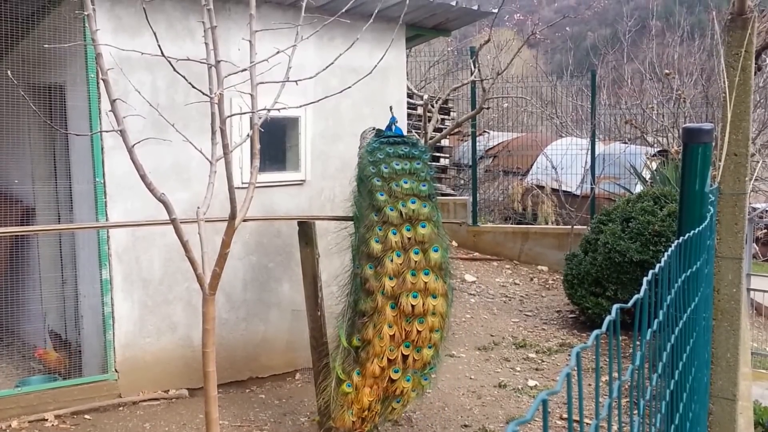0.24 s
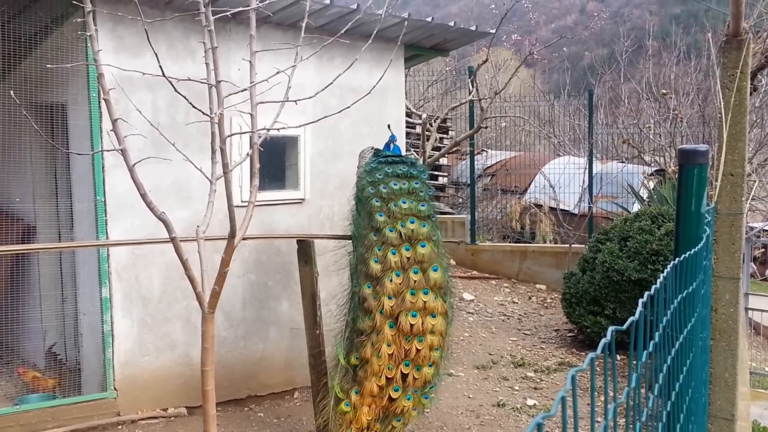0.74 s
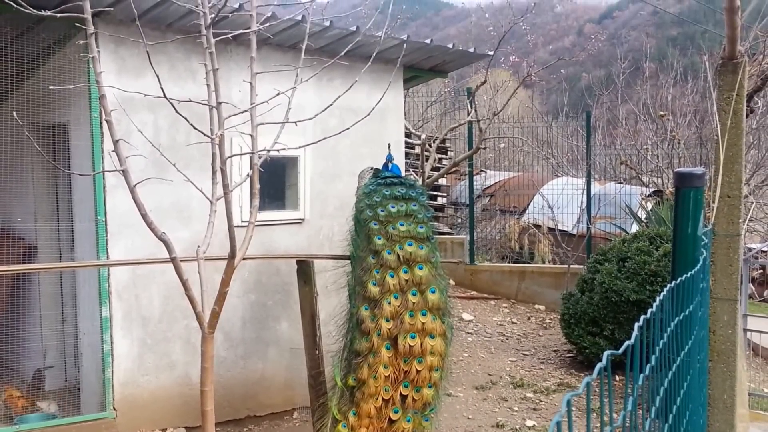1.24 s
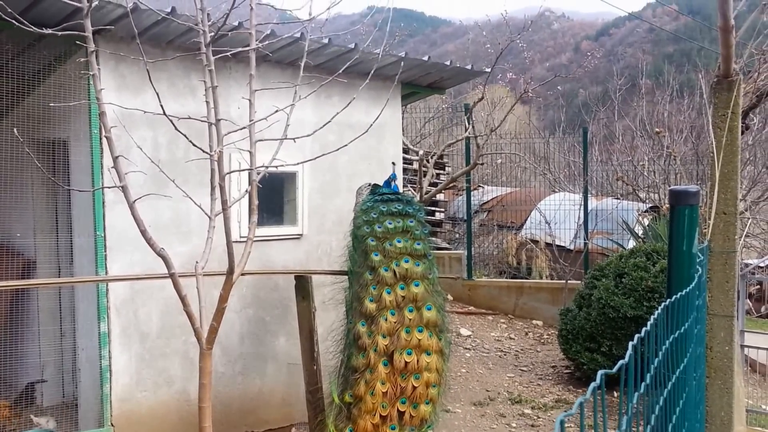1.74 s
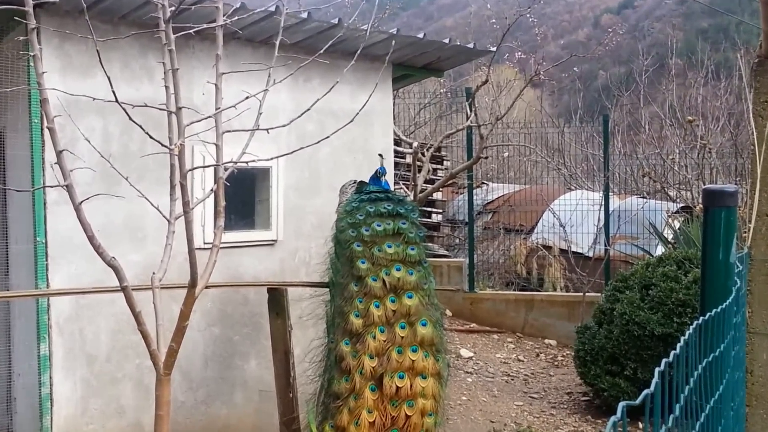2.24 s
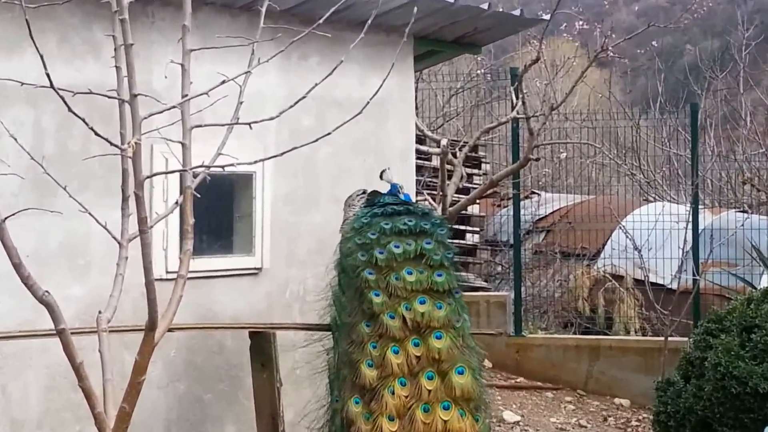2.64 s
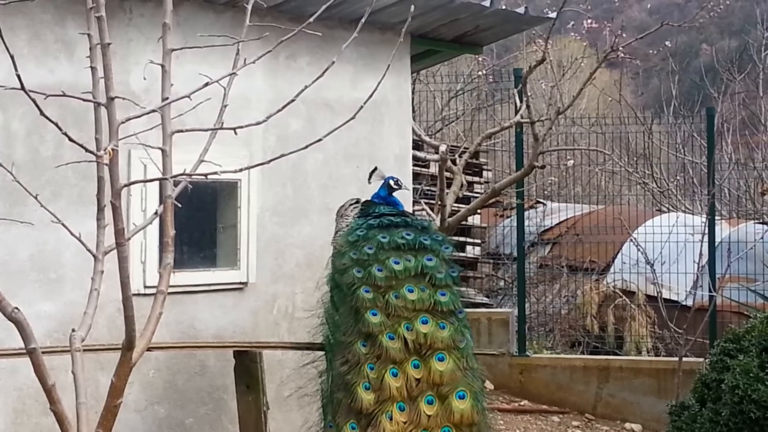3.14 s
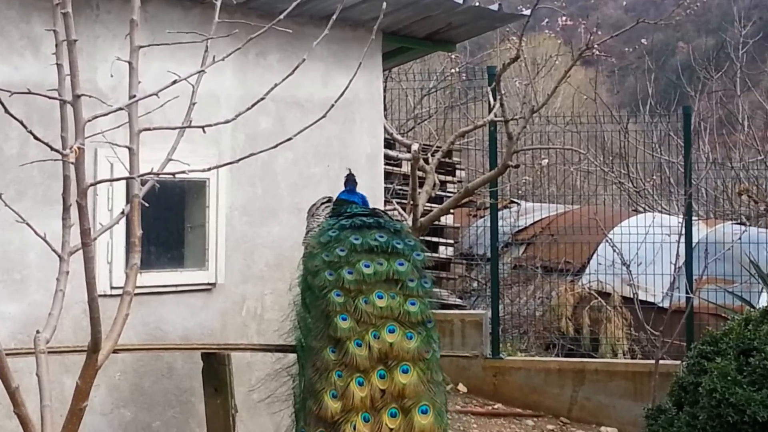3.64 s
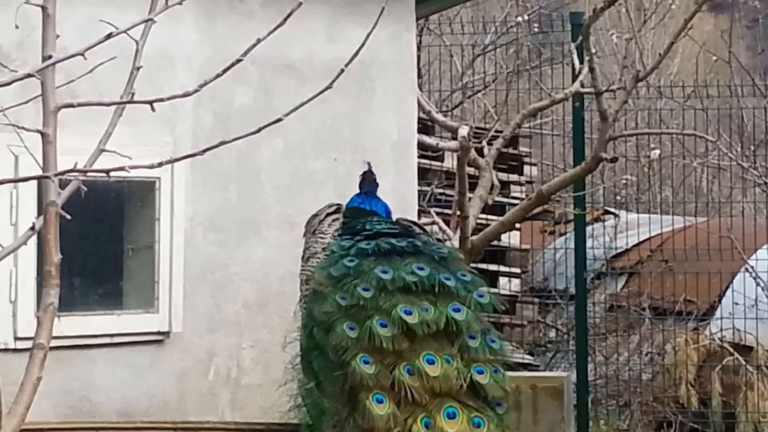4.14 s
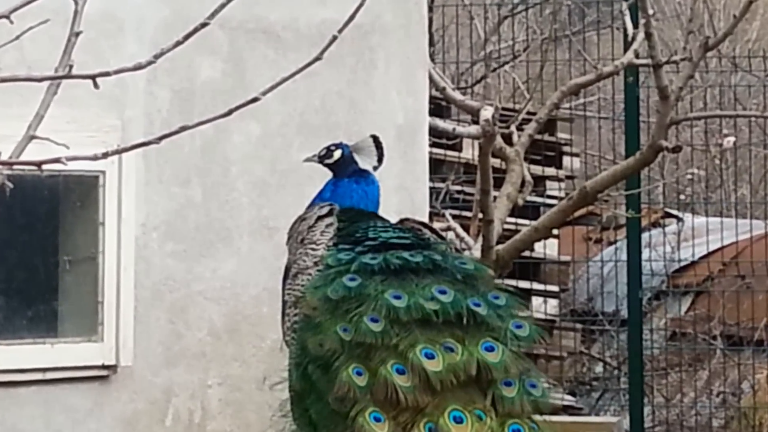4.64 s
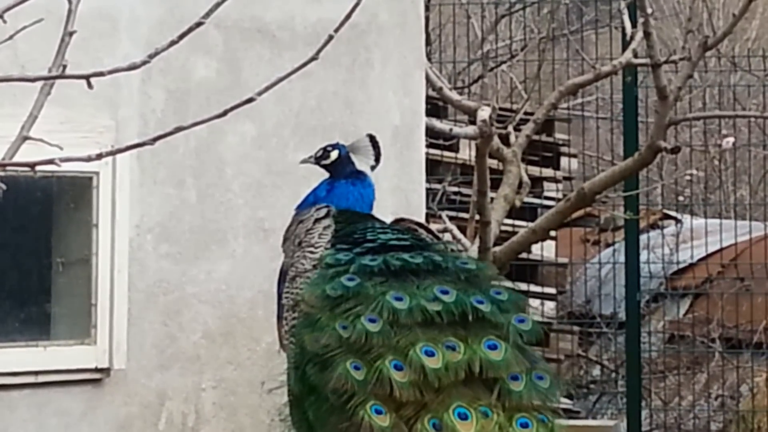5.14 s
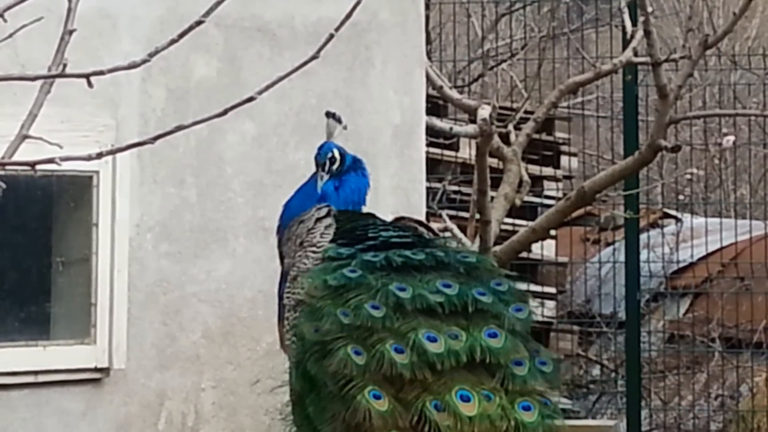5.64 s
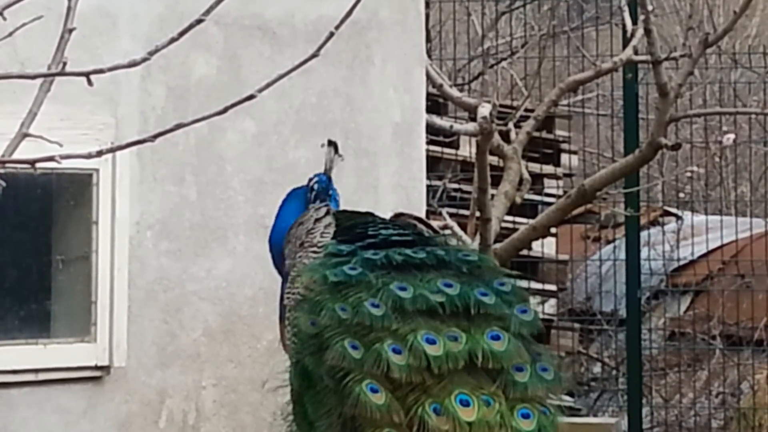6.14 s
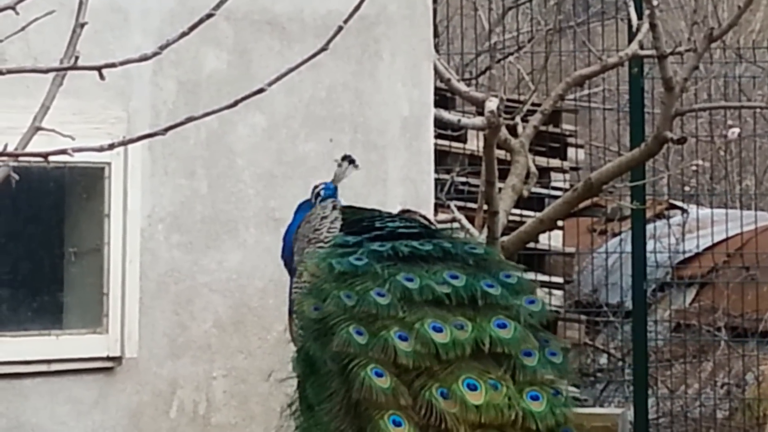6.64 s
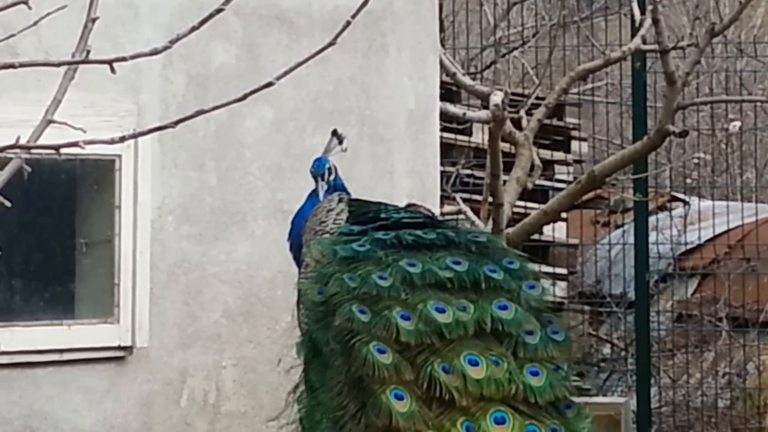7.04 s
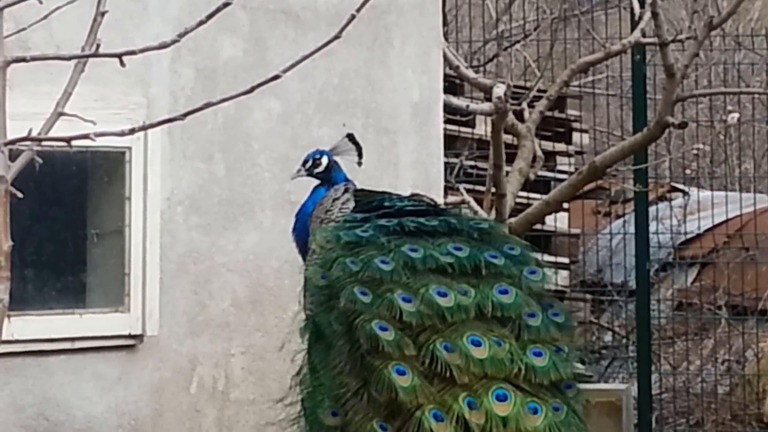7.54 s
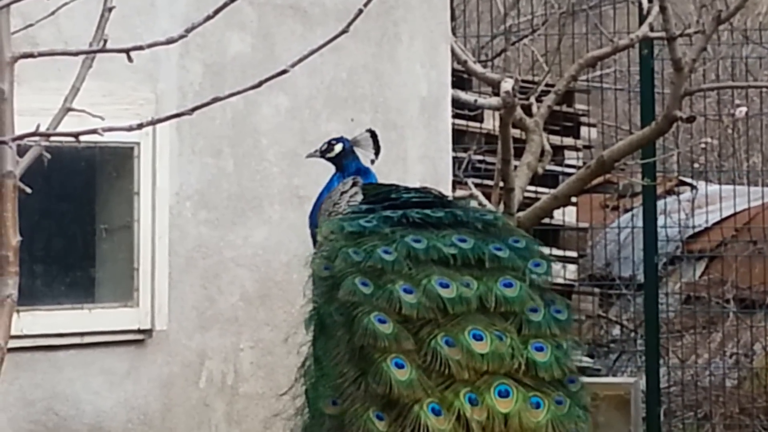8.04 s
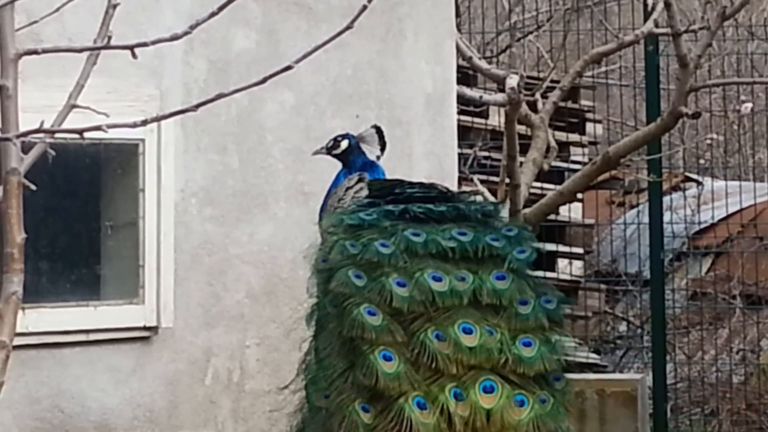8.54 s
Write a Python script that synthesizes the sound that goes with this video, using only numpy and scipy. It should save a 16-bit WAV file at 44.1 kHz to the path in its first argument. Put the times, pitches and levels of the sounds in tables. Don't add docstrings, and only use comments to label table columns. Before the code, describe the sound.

A songbird close on the left sings in a walled yard, its near-pure whistles trailing short echoes. From 0 to 0.5 s come three hooked notes with high dips, then hoarse buzzes near 0.6. A beaded trill runs from 0.8 to 1.6, over faint chick cheeps. Quick upward scoops and climbs fill 1.9 to 3.2, with faint clucks behind. A dry fast rattle at 3.25 leads to five more hooks from 3.6 to 4.4, a buzz around 4.5, four rising notes at 4.9, tiny clicks at 5.3 and dropping notes at 5.75. Thirteen falling slides follow from 6.1 to 7. Soft, spaced pips and distant rasping chatter fill 7 to 8, then a faint held whistle and closing scoops until 8.8. Hiss dips in pauses; wind thumps low, mostly right early on and strongly left near 6.8; dull finger taps mark the first second.

```python
import sys
import numpy as np
from scipy import signal
from scipy.fft import rfft, irfft
from scipy.io import wavfile
from scipy.ndimage import uniform_filter1d

SR = 44100
rng = np.random.default_rng(int(sys.argv[2]) if len(sys.argv) > 2 else 0)


def unload_wav(signal):
    wavfile.write(
        sys.argv[1],
        SR,
        np.round(np.clip(np.atleast_2d(signal).T, -1, 1) * 32767).astype(np.int16),
    )


def convert_level_to_amplitude(level_db):
    exponent = np.asarray(level_db, float) / 20
    return 10 ** exponent


N = 387638

# [t/s, length/s, start f/Hz, end f/Hz, peak level/dB]
SCOOPS = [(1.908, .052, 2640, 4890, -24.5), (1.919, .03, 4400, 5520, -24.6),
          (2.104, .043, 2930, 3750, -26.7), (2.183, .024, 2390, 3000, -35.3),
          (2.2, .049, 4640, 4960, -21.4), (2.386, .034, 2210, 3260, -26.8), (2.482, .03, 2700, 4200, -22.6),
          (2.725, .033, 2520, 3400, -28.1), (2.79, .05, 3700, 4450, -29.2),
          (5.547, .025, 6300, 5250, -14.2), (5.686, .034, 4860, 5740, -20), (6.58, .04, 4000, 4450, -41),
          (6.82, .04, 4050, 4400, -41), (8.488, .041, 2520, 3160, -29.2), (8.602, .041, 2980, 4240, -24.6),
          (8.753, .013, 4800, 7100, -33)]
# [t/s, length/s, start f/Hz, end f/Hz, peak level/dB]
RAMPS = [(.154, .033, 5530, 4940, -40.5), (.409, .019, 5350, 4990, -37.9), (1.806, .014, 3300, 5800, -41.6),
         (2.79, .05, 4950, 6000, -25.7), (3.028, .046, 3190, 3790, -27), (3.147, .036, 4350, 5900, -25),
         (3.174, .016, 5700, 7100, -36), (3.7, .018, 5100, 6000, -43), (7.175, .042, 5250, 3900, -29),
         (5.566, .011, 5300, 3000, -29), (8.385, .03, 2800, 4400, -26), (8.764, .032, 7000, 5100, -28)]
# [t/s, length/s, start f/Hz, end f/Hz, peak level/dB]
SAGS = [
    (1.587, .102, 2560, 1850, -30.1),
    (4.465, .054, 4730, 5350, -33.5),
    (6.062, .036, 3650, 2200, -21.8),
]
# [t/s, length/s, start f/Hz, end f/Hz, peak level/dB]
CLIMBS = [
    (2.278, .056, 2550, 4150, -19),
    (2.6, .065, 2600, 4300, -20),
    (4.818, .012, 2800, 5400, -16),
    (2.71, .085, 4500, 5300, -36),
    (2.77, .14, 4300, 5500, -39),
]
# [t/s, length/s, f/Hz, peak level/dB]
HOLDS = [(1.812, .05, 5810, -26.6), (2.006, .05, 2840, -43), (2.157, .032, 4250, -30.5),
         (4.544, .019, 2660, -38.1), (4.511, .04, 3950, -28), (2.075, .03, 3550, -40),
         (6.35, .05, 1280, -50), (6.61, .065, 4500, -39), (6.845, .11, 4430, -39), (6.54, .04, 1400, -49),
         (7.33, .045, 800, -49), (8.15, .25, 3740, -35), (8.726, .054, 7600, -38.7)]
# [t/s, lowest f/Hz, peak level/dB]
DIPS = [(.126, 6390, -30.9), (.298, 6040, -33.9), (2.009, 6330, -21.7), (2.526, 5700, -22),
        (2.912, 5800, -25.2), (3.715, 5870, -26), (3.893, 5870, -24.4), (4.078, 6130, -32.1),
        (4.256, 6130, -29.8), (8.408, 6080, -37.6)]
# [t/s, peak level/dB]
CHIRPS = [(.091, -37.6), (.256, -38.7), (3.68, -39.9), (3.855, -37), (4.044, -41.1), (4.219, -39),
          (8.275, -38.7)]
# [t/s, peak level/dB]
PIPS = [(7.075, -43), (7.12, -42), (7.18, -41), (7.23, -39), (7.285, -38), (7.352, -33.1), (7.392, -39),
        (7.472, -35), (7.589, -35.4), (7.699, -36), (7.813, -33.2), (7.927, -36.3), (8.038, -32.4)]
# [t/s, length/s, start f/Hz, end f/Hz, peak level/dB]
BUZZES = [(.04, .05, 5500, 5600, -40.9), (.44, .07, 2150, 2300, -40.9), (.562, .03, 7000, 6100, -37.1),
          (.575, .045, 5400, 4000, -30), (.635, .12, 2300, 2350, -38.1), (4.397, .075, 1980, 2710, -38.6),
          (4.535, .025, 7000, 5500, -32), (4.557, .028, 5000, 4100, -22), (4.597, .028, 4260, 4500, -29),
          (4.605, .12, 2450, 2370, -37.4), (5.636, .038, 2340, 3030, -36.9), (7.13, .03, 3450, 3050, -40),
          (7.19, .05, 5300, 4300, -33), (7.235, .039, 2150, 1870, -41), (7.29, .035, 3400, 2950, -41),
          (7.4, .035, 3450, 2950, -41), (7.47, .03, 6350, 6150, -47), (7.477, .029, 1750, 2080, -40.1),
          (7.62, .048, 1750, 1350, -36.8), (8.41, .04, 4800, 5300, -38.7)]
# [t/s after start, f/Hz, level/dB]
HOOK = [(0, 3600, -40), (.009, 4500, -9), (.021, 4450, 0), (.027, 4250, -10), (.032, 3950, -3),
        (.037, 2800, -32)]
RISE = [(0, 2500, -22), (.008, 3200, -9), (.017, 3750, -2), (.031, 3900, 0), (.034, 3900, -20)]
SLIDE = [(0, 4000, -20), (.009, 3850, -1), (.017, 3450, -11), (.024, 3000, 0), (.035, 2150, -23)]
DROP = [(0, 6300, -12), (.003, 5000, 0), (.006, 3600, -7), (.009, 2900, -18)]
BEAD = [(0, 2450, -20), (.005, 2600, -8), (.012, 2780, 0), (.02, 2750, -20)]
CLICK = [(0, 2600, -16), (.002, 4600, 0), (.005, 6600, -14)]
ZIG = [(0, 6900, -9), (.0025, 5600, 0), (.005, 4500, -3), (.008, 5400, -3), (.0135, 7200, -11)]
# [shape, repeats,
# (t/s, first gap/s, last gap/s, first level/dB, last level/dB, drift of f/Hz)]
PHRASES = [
    (HOOK, dict(count=3), (.013, .169, .179, -14, -16, -40)),
    (BEAD, dict(count=19), (.805, .039, .0428, -19.5, -26, -30)),
    (ZIG, dict(count=22), (3.243, .0148, .0128, -16.5, -25, -2000)),
    (HOOK, dict(count=5), (3.597, .18, .181, -17.5, -16.5, 0)),
    (RISE, dict(count=4), (4.905, .096, .112, -20, -19.5, 30)),
    (CLICK, dict(count=10), (5.323, .012, .023, -32, -29, 300)),
    (DROP, dict(count=6), (5.756, .0505, .0505, -21, -25, -250)),
    (SLIDE, dict(count=13), (6.128, .068, .074, -19, -20, 30)),
]
# [t/s, length/s, start f/Hz, end f/Hz, peak level/dB]
FAR_CALLS = [(.51, .06, 2600, 3600, -42.8), (2.05, .05, 4400, 4750, -40), (2.9, .12, 2750, 3150, -45),
             (3.7, .06, 2800, 3150, -45.4), (3.74, .18, 600, 750, -46.8), (4.44, .07, 2750, 3350, -44),
             (3.95, .07, 5100, 5300, -45), (4.44, .07, 4150, 4800, -40), (5.04, .125, 1700, 2450, -44),
             (5.045, .12, 2200, 2900, -46), (5.37, .25, 1750, 2500, -48), (3.44, .18, 930, 1150, -54),
             (3.38, .08, 500, 560, -52), (2.79, .06, 2400, 2500, -49), (8.575, .05, 4350, 4700, -43),
             (8.708, .03, 2400, 3700, -43)]
# [t/s, peak level/dB, centre f/Hz]
RASPS = [(.575, -36, 3500), (2.225, -42, 6500), (2.34, -43, 6700), (2.76, -42, 6500), (2.89, -42, 6700),
         (3.04, -45, 7000), (4.33, -43, 1100), (4.4, -41, 900), (4.42, -41, 1700), (4.62, -42, 1800),
         (4.68, -43, 1700), (4.548, -33, 4500), (6.53, -44, 1700), (6.64, -44, 2000), (6.84, -40, 5600),
         (6.98, -40, 5800), (6.98, -42, 2000), (7.075, -43, 4900), (7.07, -40, 2900), (7.19, -36, 5000),
         (7.3, -43, 4900), (7.3, -43, 2300), (7.41, -43, 2700), (7.1, -43, 6200), (7.118, -41, 1600),
         (7.14, -43, 4900), (7.2, -41, 3100), (7.235, -42, 6200), (7.26, -41, 4800), (7.355, -43, 6200),
         (7.355, -43, 1900), (7.39, -43, 4700), (7.475, -43, 4600), (7.475, -42, 3000), (7.5, -44, 5800),
         (7.612, -41, 5900), (7.62, -43, 4600), (7.63, -43, 2900), (7.69, -45, 4500)]
# [t/s, f/Hz, peak level/dB]
CHEEPS = [
    (.795, 1075, -36),
    (1.005, 1065, -41),
    (1.25, 1070, -47),
    (1.415, 1070, -44),
    (7.872, 1020, -46),
    (8.26, 940, -49),
]
# [t/s, f/Hz, peak level/dB]
CLUCKS = [
    (2.222, 640, -42),
    (2.475, 640, -43),
    (3.565, 550, -48),
    (4.225, 600, -48),
]
# [delay t/s, level/dB]
BOUNCES = [(.0065, -15), (.011, -14), (.017, -15), (.028, -16)]
# [t/s, left level/dB, right level/dB]
WIND = [(0, -61, -62), (.8, -61, -53), (1.6, -59, -37), (2.3, -56, -57), (2.7, -58, -55), (2.87, -59, -46),
        (3.1, -59, -50), (4.1, -51, -54), (4.79, -61, -55), (4.84, -60, -44), (4.93, -60, -54),
        (5.15, -60, -51), (5.45, -60, -57), (6.59, -47, -53), (6.8, -32, -53), (7.1, -56, -53),
        (7.58, -52, -39), (7.98, -56, -55), (8.18, -44, -49), (8.78, -49, -55)]
# [t/s, peak level/dB]
LEFT_PUFFS = [(5.9, -26), (6.12, -30), (6.777, -18.5), (6.803, -21.1), (6.845, -17.2), (7.31, -28),
              (7.44, -29), (7.52, -29), (8.16, -26), (8.44, -29), (8.55, -29)]
# [t/s, peak level/dB]
RIGHT_PUFFS = [(.596, -21.6), (.672, -14.2), (.884, -33), (1.002, -14.6), (1.175, -11.7), (1.335, -17.7),
               (1.448, -14), (1.592, -14.3), (1.623, -9.4), (1.668, -10.5), (1.755, -12.9), (1.964, -31),
               (2.385, -24), (2.784, -30), (2.85, -33), (2.915, -21), (3.251, -20.8), (3.299, -9),
               (4.25, -27), (4.43, -29), (4.821, -13), (4.86, -25), (5.082, -32), (5.13, -31), (5.25, -33),
               (7.43, -26), (7.571, -14.6), (7.727, -20.5), (7.85, -35), (7.9, -32), (8.08, -35),
               (8.148, -17), (8.18, -25), (8.44, -28)]
# [t/s, peak level/dB, ring f/Hz]
TICKS = [
    (.288, -29, 480),
    (.344, -28, 520),
    (.441, -28, 480),
    (.467, -33, 480),
    (.63, -32, 520),
    (1.739, -40, 2500),
    (5.248, -28, 2500),
]
# [f/Hz, left level/dB per Hz, right level/dB per Hz]
AIR = [(200, -91, -91), (700, -88.5, -89), (1500, -89.5, -99), (2200, -93, -102), (4000, -94, -103),
       (7500, -101.5, -103.5), (14000, -102, -104.5)]
# [deepest t/s, depth level/dB, sinking time/s]
DUCKS = [(.539, -6, .09), (.773, -5.5, .19), (1.711, -6.5, .06), (1.791, -10, .05), (2.454, -5, .055),
         (4.689, -4, 1.2), (4.804, -14, .115), (5.53, -7, .05), (7.343, -6.5, .24), (7.563, -7.5, .055),
         (7.792, -12.5, .065), (8.012, -14, .07), (8.132, -9, .085), (8.366, -6.5, .15)]


def scene():
    song = yard(birds())
    song_db = 10 * np.log10(uniform_filter1d(song[0] ** 2, size=900).clip(1e-9))
    opening_db = np.clip(.15 * (song_db + 50), -1.5, 2.5)
    left, right = song + air() * convert_level_to_amplitude(np.array([opening_db, .25 * opening_db]))
    return np.array([thin(left), right]) + wind() + ticks()


def birds():
    track = np.zeros(N)
    for s, note in whistles() + far_voices():
        add(track, s, note)
    buzzes(track)
    phrases(track)
    return track


def whistles():
    kinds = (SCOOPS, .8), (RAMPS, .46), (SAGS, .17), (FAR_CALLS, .7)
    notes = [(s, glide(*note, bend)) for rows, bend in kinds for s, *note in rows]
    notes += [(s, glide(*note, .42, late=4.5)) for s, *note in CLIMBS]
    notes += [(s, arc(length, hz, hz, hz, db, rough_hz=28)) for s, length, hz, db in HOLDS]
    notes += [(s, glide(.033, 1970, 2330, db, .88)) for s, db in CHIRPS]
    pip_hz, pip_ends = 3690, 1.017
    for s, db in PIPS:
        notes.append((s, arc(.03, pip_ends * pip_hz, pip_hz, pip_ends * pip_hz, db, rough_hz=28)))
    dip_s = .035
    for s, hz, db in DIPS:
        notes.append((s, arc(dip_s, 1.045 * hz, hz, 1.025 * hz, db)))
        notes.append((s + dip_s - .006, glide(.022, hz, 1.11 * hz, db - 16, .5)))
    return notes


def glide(length, start_hz, end_hz, db, bend, **rough):
    mid_hz = start_hz + bend * (end_hz - start_hz)
    return arc(length, start_hz, mid_hz, end_hz, db, **rough)


def arc(length, start_hz, mid_hz, end_hz, db, rough_hz=60, late=1.1):
    u = np.linspace(0, 1, num=17)
    hz = start_hz * (1 - u) * (1 - 2 * u)
    hz += 4 * mid_hz * u * (1 - u)
    hz += end_hz * u * (2 * u - 1)
    swell_db = db - 22.5 * np.abs(2 * u ** late - 1) ** 3.5
    return sing(int(length * SR), u * length, hz, swell_db, rough_hz)


def sing(out_len, s, hz, db, rough_hz=35):
    t = np.arange(out_len) / SR
    trembling_hz = np.interp(t, s, hz) + rough_hz * shiver(out_len, size=49)
    phase = 2 * np.pi * (np.cumsum(trembling_hz) / SR + rng.random())
    top_hz = np.max(hz)
    octave_db = -31 - 11 * (3000 < top_hz < 5400 or np.ptp(hz) > 1800)
    third_db = -50 + 17 * (3950 < top_hz < 5400)
    tone = np.sin(phase) + convert_level_to_amplitude(octave_db) * np.sin(2 * phase) + convert_level_to_amplitude(third_db) * np.sin(3 * phase)
    edge = np.clip(np.minimum(t, t[::-1]) / .001, 0, 1)
    return tone * convert_level_to_amplitude(np.interp(t, s, db)) * edge


def buzzes(track):
    for s, length, *note in BUZZES:
        tone = glide(1.2 * length, *note, .55, rough_hz=.034 * np.mean(note[:2]))
        flutter_hz = 230 * (1 + .2 * shiver(len(tone), size=150))
        flutter = .5 + .5 * np.sin(2 * np.pi * np.cumsum(flutter_hz) / SR)
        add(track, s, 2.2 * tone * flutter ** 1.8)


def phrases(track):
    for shape, repeats, (s, gap, last_gap, db, last_db, drift_hz) in PHRASES:
        at, hz, rel_db = np.transpose(shape)
        count, rattle = repeats["count"], shape == ZIG
        drift_share = np.interp(hz, [min(hz), max(hz)], [1, .4]) if rattle else 1
        for k, (detune, uneven) in enumerate(rng.standard_normal((count, 2))):
            u = k / (count - 1)
            pitch_hz = (hz + u ** .7 * drift_hz * drift_share) * (1 + .006 * detune)
            now_db = rel_db + db + u * (last_db - db) + .8 * uneven
            if rattle:
                now_db = now_db - 3.0 * ((pitch_hz - 5050) / 1100) ** 2
                now_db = now_db - 9 * .45 ** k
            add(track, s, sing(int(at[-1] * SR), at, pitch_hz, now_db, 110 if rattle else 35))
            s += gap + (last_gap - gap) * k / (count - 2)


def far_voices():
    notes = [(s, rasp(*call)) for s, *call in RASPS]
    notes += [(s, stack(*call, throat_hz=4900, width_hz=1050)) for s, *call in CHEEPS]
    return notes + [(s, stack(*call, throat_hz=1250, width_hz=750)) for s, *call in CLUCKS]


def rasp(db, hz):
    length, rate_hz, span = .05, 110, 1.17
    u = np.linspace(0, 1, int(length * SR))
    chop = np.sin(np.pi * rate_hz * length * u) ** 2 * np.sin(np.pi * u ** .5)
    breath = chop * rng.standard_normal(len(u))
    return convert_level_to_amplitude(db + 5) * band(breath, hz / span, hz * span, order=3)


def stack(hz, db, throat_hz, width_hz):
    length = .04
    t = np.arange(int(length * SR)) / SR
    wobble = .03 * shiver(len(t), size=100)
    phase = 2 * np.pi * np.cumsum(hz * (1 - .08 * np.exp(-t / .008) + wobble)) / SR
    k = np.arange(1, 8)[:, None]
    resonance = np.exp(-((k * hz - throat_hz) / width_hz) ** 2)
    tone = np.sum(resonance * np.sin(k * phase + k * k), axis=0)
    return convert_level_to_amplitude(db) * tone * np.sin(np.pi * (t / length) ** .7)


def shiver(length, size):
    smooth = uniform_filter1d(rng.standard_normal(length + size), size=size)
    return smooth[:length] * np.sqrt(size)


def add(track, s, x):
    i = max(int(s * SR), 0)
    track[i:i + len(x)] += x[:len(track) - i]


def band(x, low_hz, high_hz, order=2):
    edges_hz = [low_hz, min(high_hz, .45 * SR)]
    return signal.sosfilt(signal.butter(order, edges_hz, "band", fs=SR, output="sos"), x)


def walk(rate, channels=1):
    k = int(SR / rate)
    levels = rng.standard_normal((channels, N // k + 1))
    return uniform_filter1d(levels[:, np.arange(N) // k], k)


def yard(x):
    t = np.arange(int(.6 * SR)) / SR
    walls = convert_level_to_amplitude(-38.3 - 60 * t / .26) * np.clip(t / .004, 0, 1) / (1 + np.exp((t - .05) / .006))
    tail = convert_level_to_amplitude(-46 - 60 * t / .45) * np.clip(t / .01, 0, 1)
    grain = rng.standard_normal((3, len(t))) * convert_level_to_amplitude(4.0 * rng.standard_normal((3, len(t))))
    turn = 1.5 * walk(6)[0]
    aims = np.cos(turn), np.sin(turn), 1
    one, other, aside = (signal.fftconvolve(x * aim, (walls + tail) * g)[:N] for aim, g in zip(aims, grain))
    near = x.copy()
    for (s, db), sway in zip(BOUNCES, walk(9, channels=4)):
        near += convert_level_to_amplitude(db + 2.2 * sway) * np.roll(x, int(s * SR))
    left = near + one + other
    right = near + .7 * (one + other) + .7 * aside
    shaded = convert_level_to_amplitude(-28) * right + convert_level_to_amplitude(-19) * band(right, 300, 2350)
    return np.array([np.roll(left, shift=18), shaded])


def wind():
    s, *db = np.transpose(WIND)
    eddies = rng.standard_normal((2, N)) * convert_level_to_amplitude(7.0 * rng.standard_normal((2, N)))
    rumble = band(eddies, 42, 175) * convert_level_to_amplitude(3.5 * walk(25, channels=2))
    gust_db = np.array([np.interp(np.arange(N) / SR, s, d) for d in db])
    rumble *= convert_level_to_amplitude(gust_db + 1.5) / rumble.std()
    t = np.arange(-600, 1800) / SR
    puffs = [(0, *row) for row in LEFT_PUFFS] + [(1, *row) for row in RIGHT_PUFFS]
    for (port, s, db), turn in zip(puffs, rng.random(len(puffs))):
        cycles = t * (205 + 3.2 * db)
        swell = np.where(t < 0, np.exp(-(cycles / .3) ** 2), np.exp(-cycles / .6))
        slowing = 1.5 * np.sign(cycles) * np.log1p(.7 * np.abs(cycles))
        add(rumble[port], s + t[0], convert_level_to_amplitude(db + 2.5) * swell * np.cos(2 * np.pi * (turn + slowing)))
    return band(rumble, 35, 600, order=1)


def ticks():
    out, t = np.zeros(N), np.arange(400) / SR
    for s, db, hz in TICKS:
        burst = rng.standard_normal(len(t)) * np.exp(-t / .0015)
        add(out, s, convert_level_to_amplitude(db + 4) * band(burst, .5 * hz, 2.5 * hz, order=1))
    return out * convert_level_to_amplitude(np.array([[-7], [0]]))


def air():
    hz, *db = np.transpose(AIR)
    f = np.arange(N // 2 + 1) * SR / N + 1
    colour_db = np.array([np.interp(np.log(f), np.log(hz), d) for d in db])
    colour = convert_level_to_amplitude(colour_db) * np.sqrt(SR / 2)
    hiss = irfft(rfft(rng.standard_normal((2, N))) * colour, N)
    edges_hz = 400 * 1.3 ** np.arange(12)
    for low_hz, patch in zip(edges_hz, walk(14, channels=12)):
        hiss[0] += band(hiss[0], low_hz, 1.3 * low_hz) * (convert_level_to_amplitude(3.6 * patch) - 1)
    return hiss * convert_level_to_amplitude(1.8 * walk(12))


def thin(x):
    f, t, cells = signal.stft(x, SR, nperseg=512)
    power = uniform_filter1d(np.abs(cells) ** 2, size=9, axis=1)
    patch_db = 10 * np.log10(uniform_filter1d(power, size=6, axis=0) + 1e-18)
    draws = rng.standard_normal((len(f) // 5 + 1, len(t) // 8 + 1))
    luck = draws[np.arange(len(f))[:, None] // 5, np.arange(len(t)) // 8]
    song_db = 10 * np.log10(power[f > 2000].sum(axis=0) + 1e-18)
    limit_db = song_db - 51 + 3.0 * luck - .6 * (f[:, None] / 1e3 - 8)
    kept = (patch_db > limit_db) | (f[:, None] < 4200)
    return signal.istft(cells * kept, SR)[1][:N]


def roll_off(x):
    return signal.sosfilt(signal.butter(12, 15590, fs=SR, output="sos"), x)


def record(dry):
    t = np.arange(N) / SR
    open_db, reopen_s = 1.0, .035
    gate_db = open_db + sum(np.interp(t, [s - sinking, s, s + reopen_s], [0, db, 0])
                            for s, db, sinking in DUCKS)
    top_cut = signal.ellip(10, .2, 70, 14650, fs=SR, output="sos")
    mix = signal.sosfiltfilt(top_cut, dry * convert_level_to_amplitude(gate_db))
    return roll_off(mix)


dry = scene()
out = record(dry)
unload_wav(out)
```